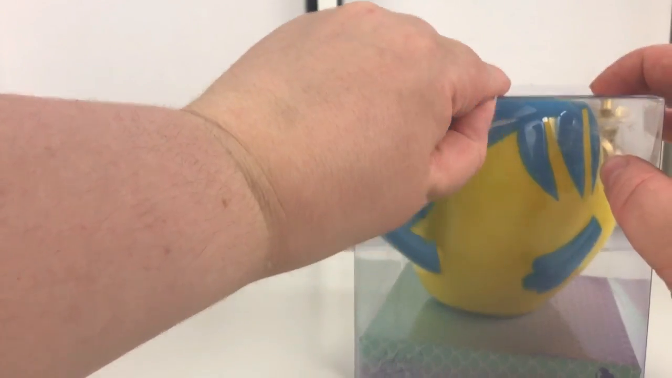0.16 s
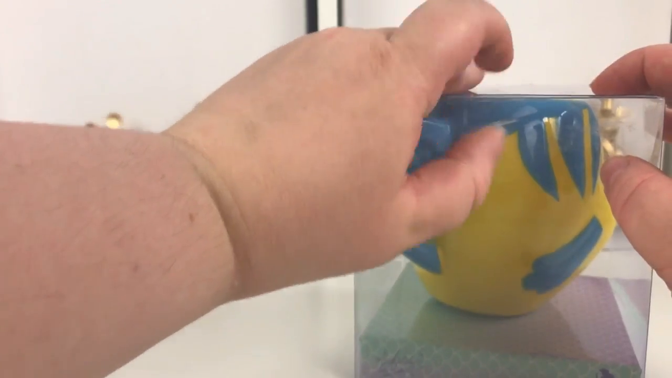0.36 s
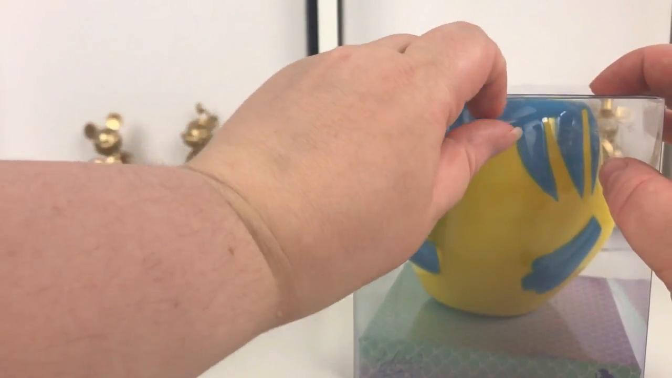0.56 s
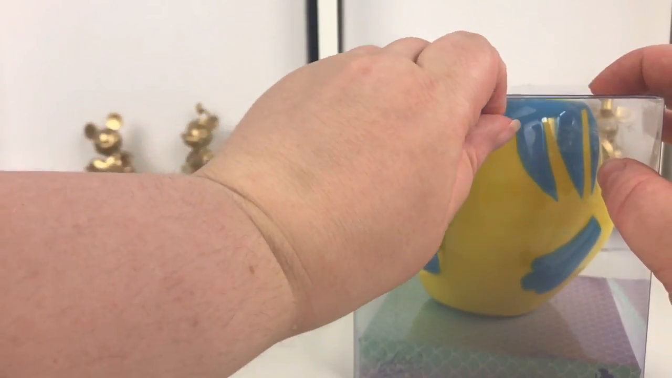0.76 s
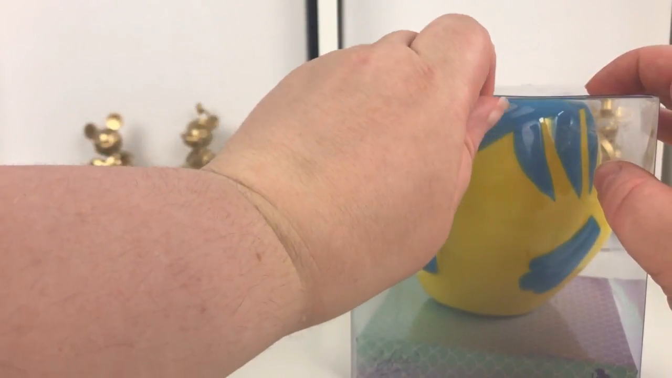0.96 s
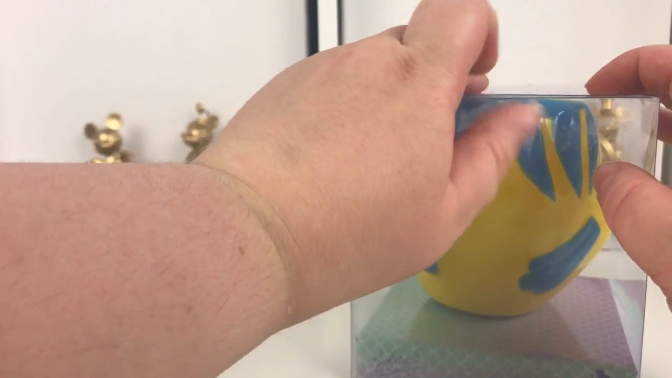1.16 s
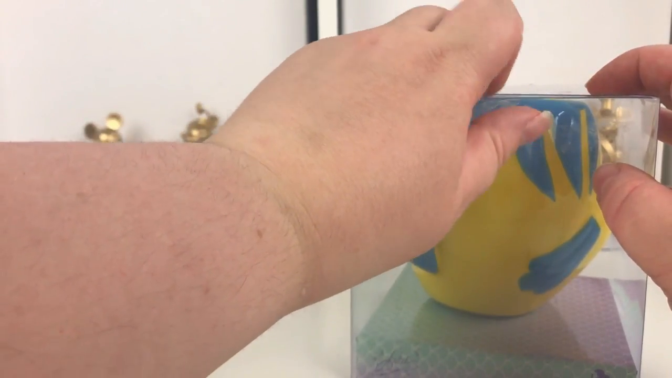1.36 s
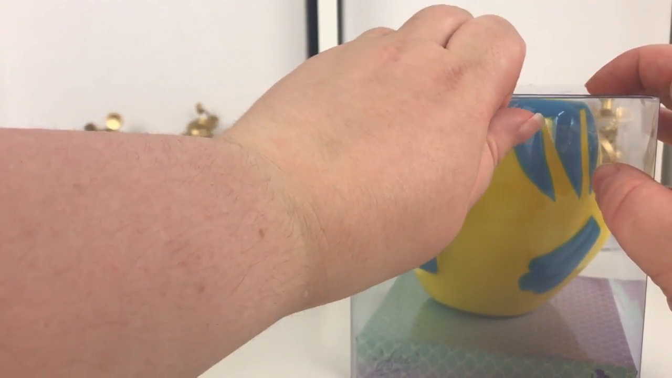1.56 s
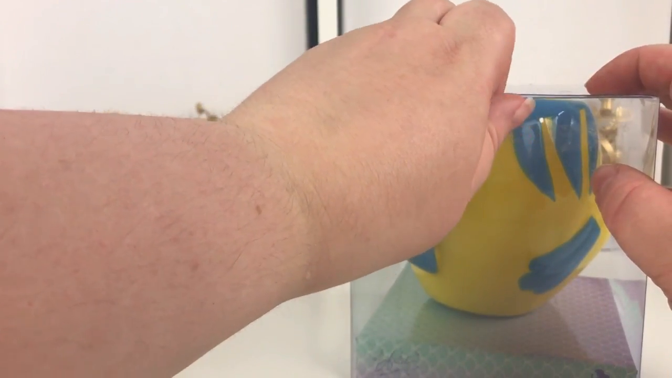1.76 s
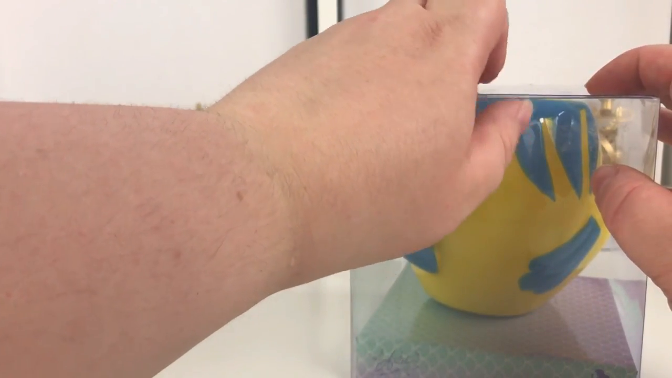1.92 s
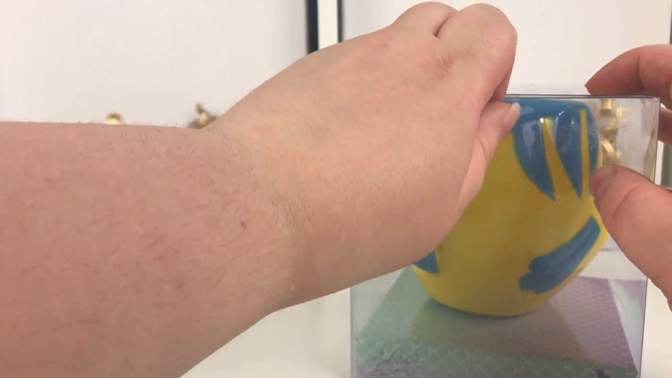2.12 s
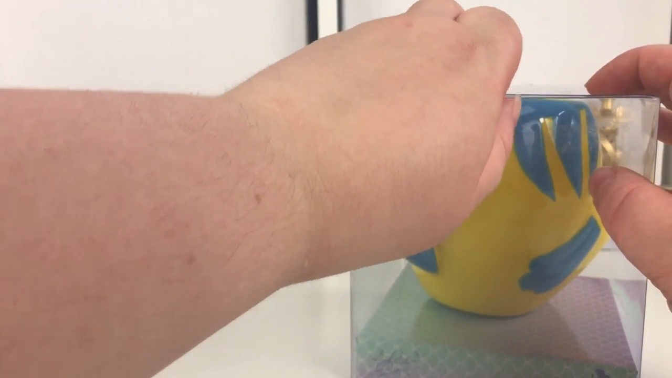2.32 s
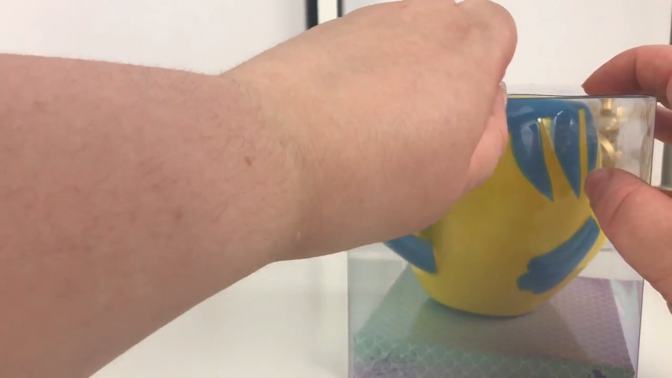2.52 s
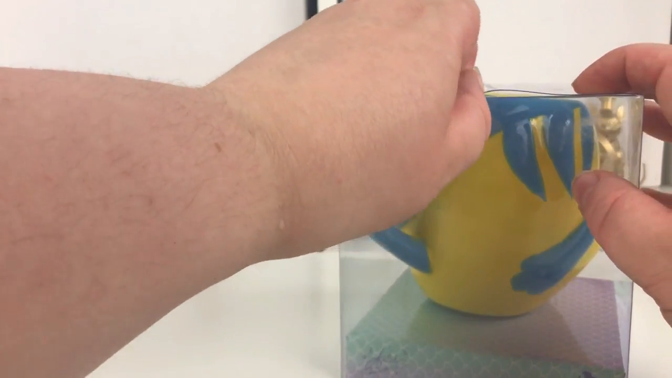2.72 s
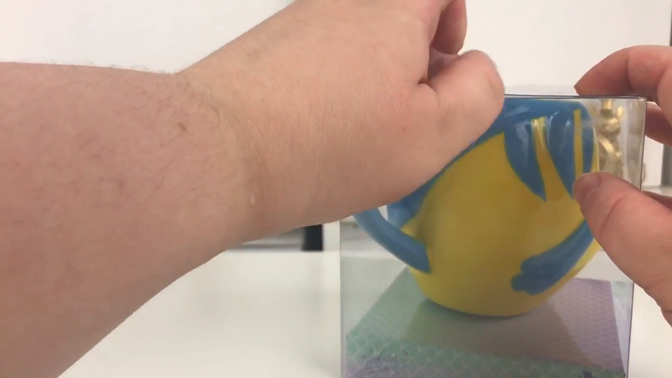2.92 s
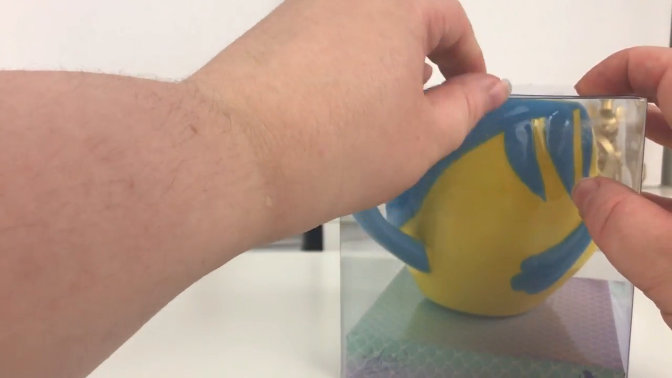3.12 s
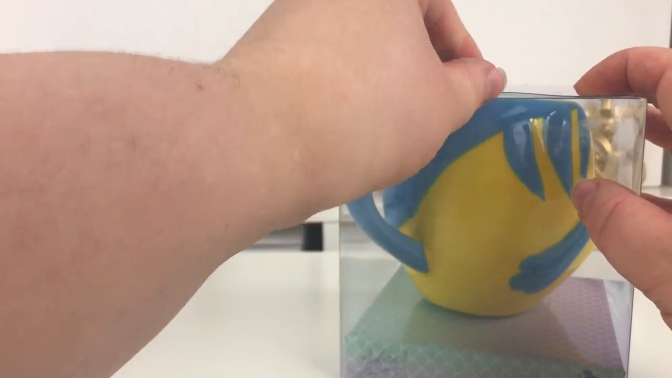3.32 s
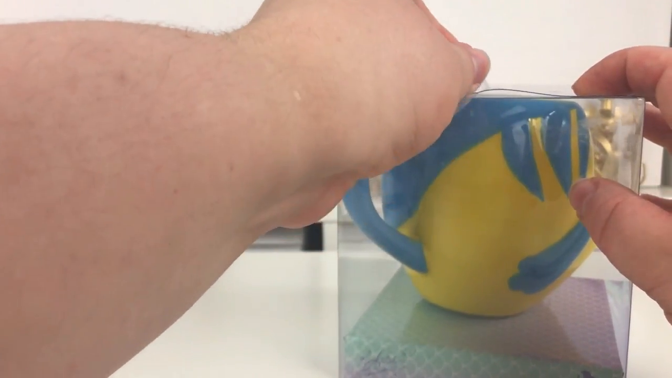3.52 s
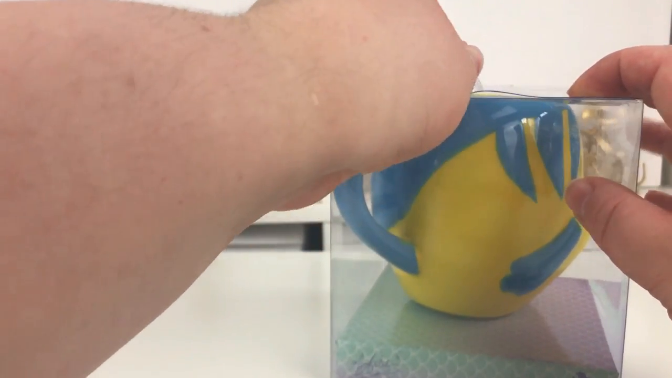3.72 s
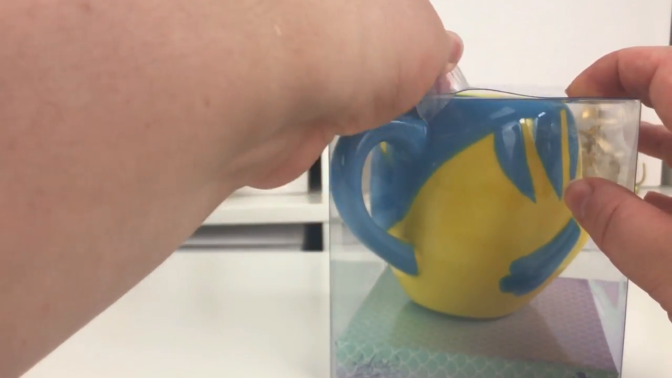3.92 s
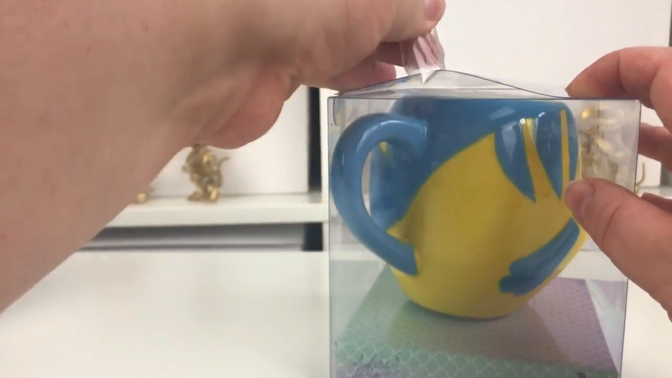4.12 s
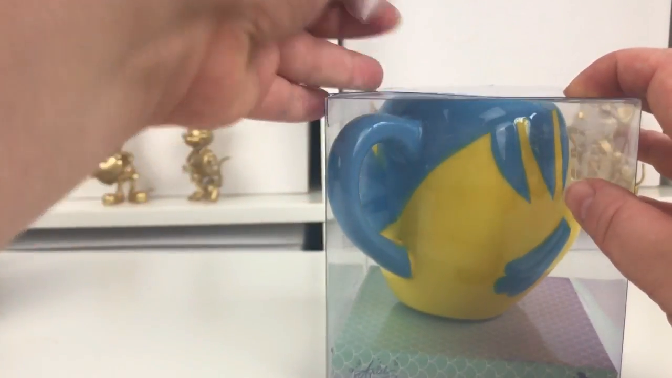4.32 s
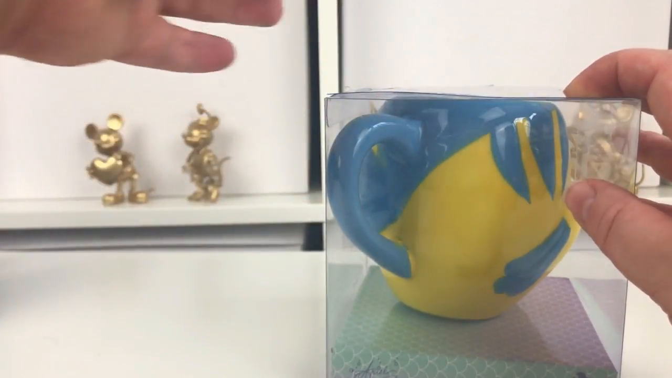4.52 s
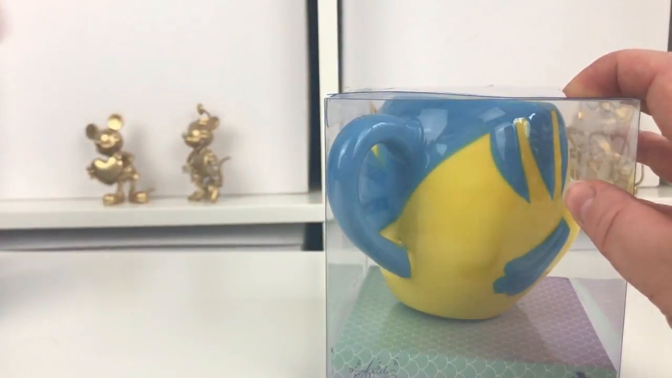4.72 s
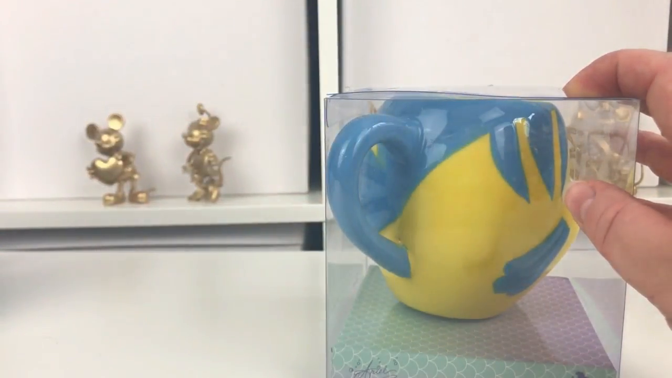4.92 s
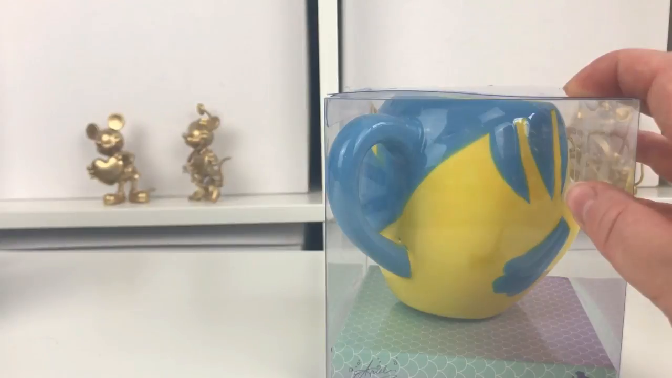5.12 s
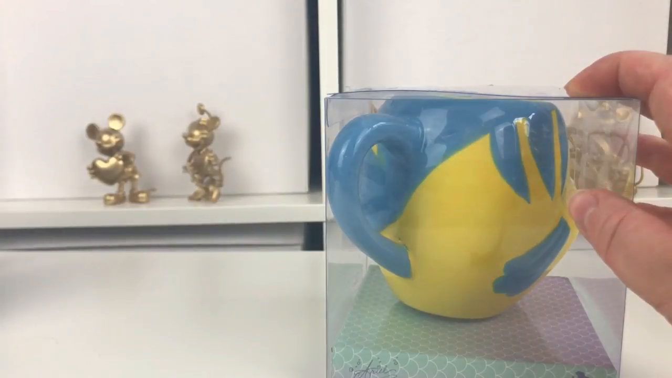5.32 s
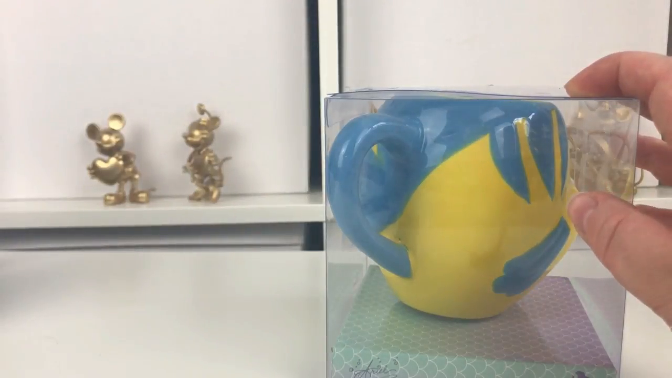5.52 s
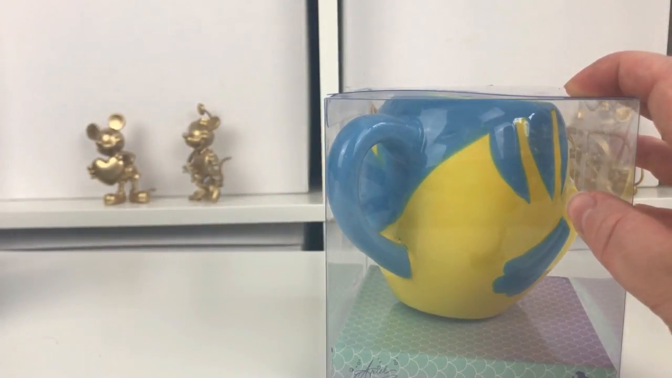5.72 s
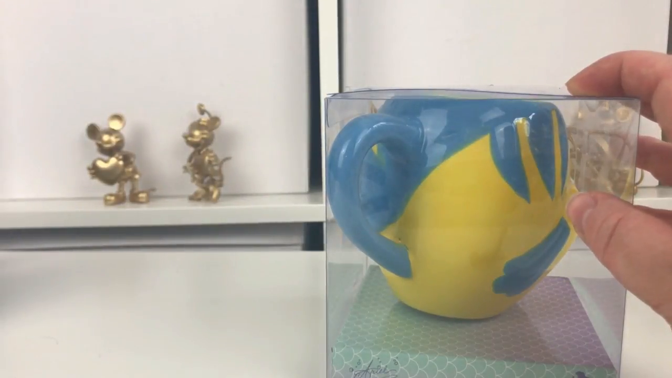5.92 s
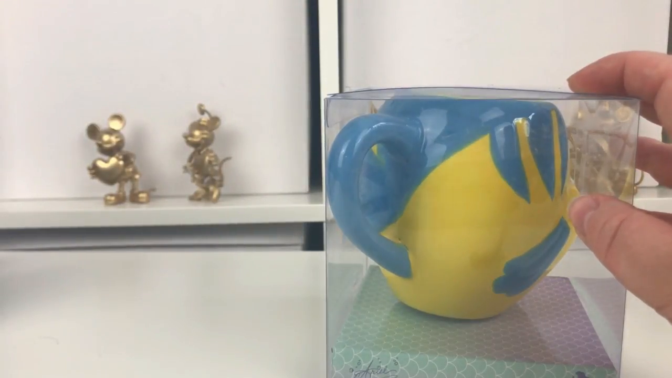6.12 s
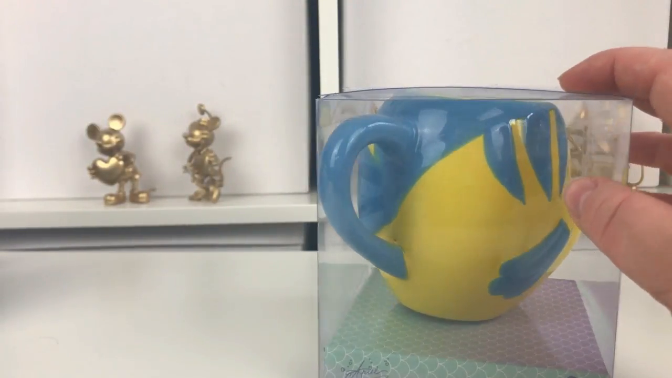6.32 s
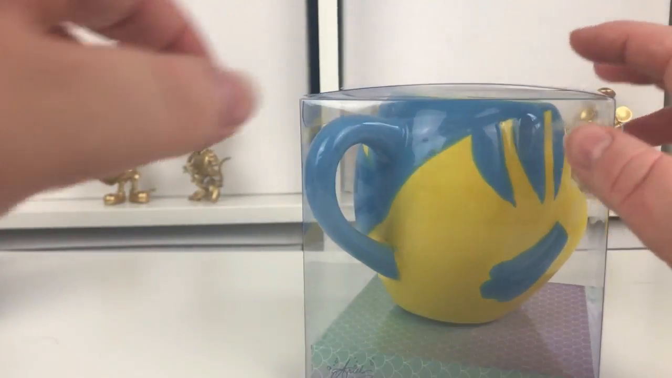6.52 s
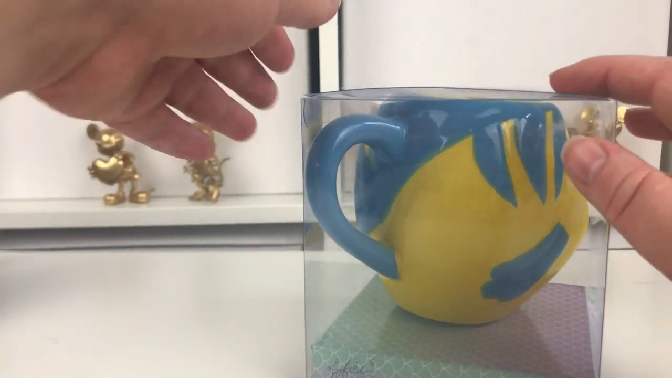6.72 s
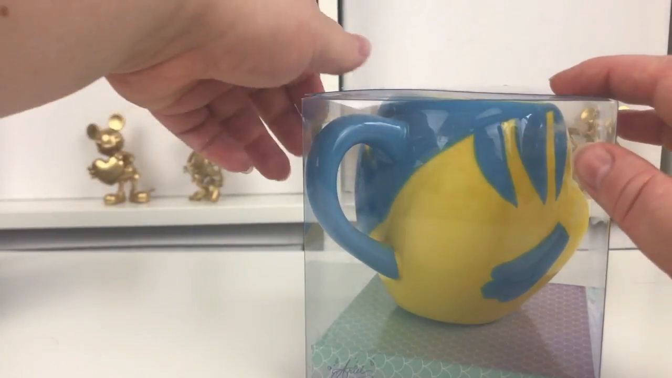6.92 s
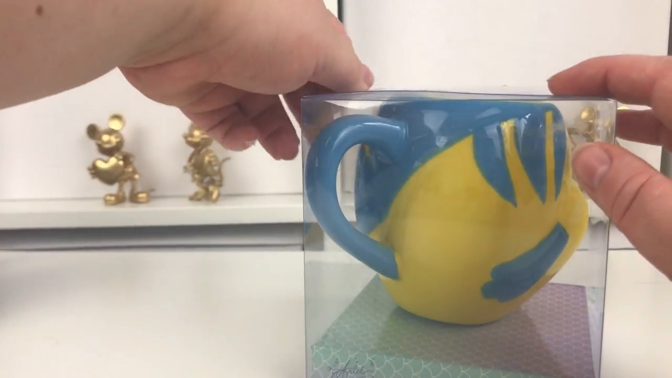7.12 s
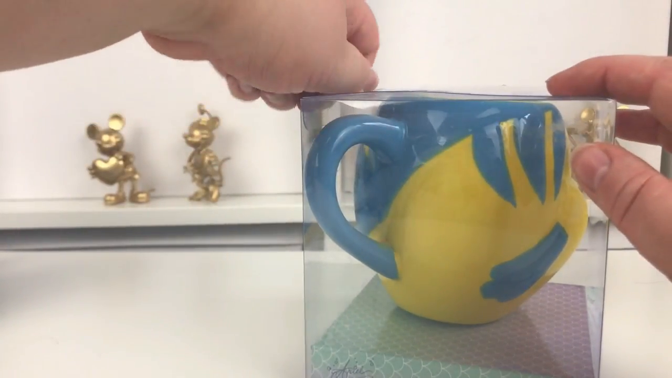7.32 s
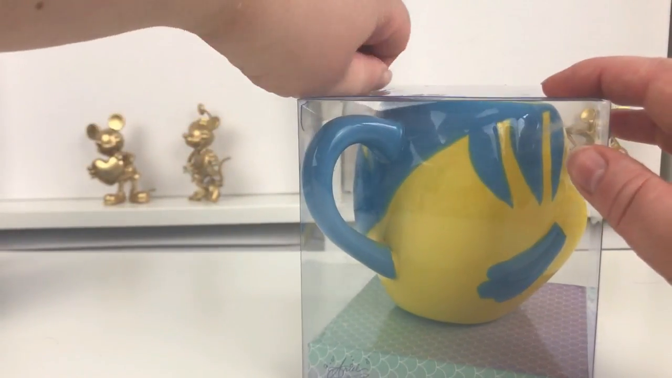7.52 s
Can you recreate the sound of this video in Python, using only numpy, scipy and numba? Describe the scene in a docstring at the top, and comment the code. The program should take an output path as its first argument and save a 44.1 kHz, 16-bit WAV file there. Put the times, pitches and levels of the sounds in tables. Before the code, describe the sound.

A small quiet room, microphone very close to a thin hollow plastic box. Soft skin rubbing and light knocks lead to a loud, sharp lid snap at 0.3 s, ringing briefly with short room echoes and a little hiss. From 0.5 to 1.7 s come irregular nail ticks, dull wall knocks and faint airy peeling. At 1.8-1.95 s a nail judders in a rapid rattle, followed by rubbing and scattered clicks until about 3.9 s, with stronger ticks near 3.0 and 3.6 s. Adhesive sizzle swells from 4.05 s into a hard springy pop at 4.2 s, then another at 4.47 s. Rubbing fades by 5 s into low room hush. Faint crinkles come at 5.7-6.1 s, a soft hand slide at 6.5 s, gentle taps and rubbing until 7.4 s, then one bright snap at 7.58 s.

```python
"""A small quiet room: fingernails pick at stickers on a thin clear plastic box, close to the microphone.
Nails tick and judder on the lid, fingers knock the walls, and four times the sheet snaps back: each contact
is a noise crack, a modal ring of the box and room echoes. Adhesive sizzles as it peels: random grains
through a gliding film resonance. The freed sticker crinkles, then the hand slides and picks again;
skin rubs, wall rumble and room hush are shaped noise, and loud peaks raise the recorder's hiss."""
import sys
import numpy as np
from scipy import signal
from scipy.fft import rfft, irfft, next_fast_len
from scipy.io import wavfile
from scipy.ndimage import uniform_filter1d, map_coordinates
from numba import njit

SR = 44100
rng = np.random.default_rng(int(sys.argv[2]) if len(sys.argv) > 2 else 0)


def unload_wav(signal):
    """Save mono or channel-first audio to the path in sys.argv[1] as 16-bit WAV at rate SR, clipped to [-1, 1]."""
    wavfile.write(
        sys.argv[1],
        SR,
        np.round(np.clip(np.atleast_2d(signal).T, -1, 1) * 32767).astype(np.int16),
    )


N = 337806
TIME = np.arange(N) / SR
RING_TIME = np.arange(SR // 2) / SR

# band edges of a snapping sheet's spectrum: (edge [Hz])
SNAP_EDGES_HZ = (30, 110, 180, 380, 520, 700, 850, 1400, 2800, 4500, 5600, 8500, 18000)


def undb(db):
    """Decibels to gain."""
    return 10 ** (np.asarray(db) / 20)


def unit(x):
    """Scale to unit energy."""
    return x / np.sqrt(np.sum(x ** 2) + 1e-18)


def fade(t60_s):
    """A decay that loses 60 dB in t60_s."""
    return np.exp(-np.log(1000) * RING_TIME / max(t60_s, 1e-4))


def band(x, low_hz, high_hz):
    """Causal band-pass."""
    return signal.sosfilt(signal.butter(3, (low_hz, high_hz), "band", fs=SR, output="sos"), x)


def colour(x, points):
    """Weight the spectrum of x by (frequency [Hz], level [dB]) points, then scale to standard deviation 1."""
    hz, db = np.transpose(points)
    size = next_fast_len(N)
    bin_hz = np.maximum(np.fft.rfftfreq(size, 1 / SR), 1)
    gain = undb(np.interp(np.log(bin_hz), np.log(hz), db, left=-80, right=-80))
    y = irfft(rfft(x, size) * gain, size)[:N]
    return y / np.std(y)


def walk(rate_hz):
    """Slow chance with a spread near 1: random knots joined by lines."""
    knots = rng.standard_normal(4096)
    return np.interp(TIME * rate_hz, np.arange(len(knots)), knots)


def grains(rate_hz, spread_db):
    """Tiny releases at random moments, a few far stronger than the rest."""
    happens = rng.random(N) < rate_hz / SR
    strength = undb(spread_db * np.minimum(rng.exponential(size=N), 4))
    return happens * rng.standard_normal(N) * strength


def stroke(start_s, end_s, attack_s, release_s):
    """A movement of the hand: it builds, holds, and dies away after its end."""
    rise = np.clip((TIME - start_s) / attack_s, 0, 1)
    return rise * np.exp(-np.maximum(TIME - end_s, 0) / release_s)


@njit
def resonate(x, hz, sharpness):
    """A resonance whose centre moves; gain 1 at the centre."""
    y, b, low = np.empty(len(x)), 0., 0.
    k = 1 / sharpness
    for i in range(len(x)):
        g = np.tan(np.pi * hz[i] / SR)
        v = (b + g * (x[i] - low)) / (1 + g * (g + k))
        b, low, y[i] = 2 * v - b, low + 2 * g * v, k * v
    return y


def box_ring(damping, detune):
    """The box's modes; a touch shifts them a little, and its place favours some over others."""
    # modes before detune and damping: (frequency [Hz], level [dB], t60 [s])
    box_modes = [(86, -10, 0.4), (125, -2, 0.19), (166.7, -1.5, 0.25), (213.2, -2, 0.12),
                 (289.4, -2.5, 0.28), (342.2, 1.5, 0.19), (372.3, -7, 0.26), (423.3, -2, 0.14),
                 (448, -4.5, 0.13), (552.6, -1, 0.15), (753, -7.5, 0.055), (810, -10.5, 0.017),
                 (982, 0.5, 0.045), (1119.4, -0.5, .07), (1242, -6, 0.057), (1579, -9.5, 0.085),
                 (1797, -10, 0.1), (1867, -15, .06), (2390, -6, 0.054), (3040, -9.5, .07),
                 (3286, -0.5, 0.041), (3950, 1.5, 0.055), (4040, -5, 0.029), (6100, -7.5, .06),
                 (6400, 1.5, 0.053), (8300, -13, 0.014)]
    hz, db, t60_s = np.transpose(box_modes)[:, :, None]
    shift, place = rng.standard_normal((2, *hz.shape))
    hz = hz * np.exp(detune * shift)
    db = db + min(90 * detune, 6) * place
    t = RING_TIME[:len(RING_TIME) // 2]
    decay = np.exp(-np.log(1000) * damping * t / t60_s)
    ring = np.sum(undb(db) * np.sin(2 * np.pi * hz * t) * decay, axis=0)
    return np.pad(ring, (0, len(RING_TIME) - len(ring)))


def band_levels(edges_hz, bands_db, tilt_db):
    """Share a contact's energy among the bands; a harder touch tilts it towards the treble."""
    octaves = np.log2(np.multiply(edges_hz[:-1], edges_hz[1:])) / 2
    return unit(undb(np.array(bands_db) + tilt_db * octaves))


def contacts(rows, edges_hz, bands_db, crack_t60_s, crack_slope, ring_db, ring_slope,
             damping, detune, room_db, gain_db):
    """Each contact is a short crack in the sheet, the ring of the box, and the room's answer."""
    # crack_t60_s, ring_db and room_db hold at 1 kHz; gain_db adds to every row's level
    out = np.zeros(N + len(RING_TIME))
    reference = np.sqrt(SR / 100)  # levels are energy spread over a hundredth of a second
    room_onset = 1 - np.exp(-RING_TIME / 0.01)
    for time_s, db, tilt_db in rows:
        crack, echoes = rng.standard_normal((2, len(RING_TIME)))
        crack[0] = 6  # the release itself is one sharp step, ahead of the scattered waves
        ring = box_ring(damping, detune)
        start = max(int(time_s * SR), 0)
        shares = band_levels(edges_hz, bands_db, tilt_db)
        for low_hz, high_hz, share in zip(edges_hz, edges_hz[1:], shares):
            khz = np.sqrt(low_hz * high_hz) / 1000
            # bending waves and room echoes both die sooner in the treble
            fading_crack = crack * fade(crack_t60_s / khz ** crack_slope)
            fading_echoes = echoes * room_onset * fade(0.18 / khz ** 0.13)
            parts = np.array([fading_crack, ring, fading_echoes])
            direct, body, room = map(unit, band(parts, low_hz, high_hz))
            close = unit(direct + undb(ring_db) / khz ** ring_slope * body)
            sound = unit(close + undb(room_db) / khz ** 0.33 * room)
            out[start:start + len(sound)] += reference * undb(db + gain_db) * share * sound
    return out[:N]


def flicks():
    """A nail slips off the rim and the lid snaps back."""
    # (time [s], level before gain_db [dB], tilt [dB/octave])
    events = [(0.3241, -4.5, -1.03), (7.5833, -9.5, 0.83)]
    # spectrum before tilt: (level per band [dB])
    bands_db = [-30.5, -21, -12.5, -15.5, -18.5, -12, -14, -22, -28.5, -37, -28.5, -30]
    return contacts(events, SNAP_EDGES_HZ, bands_db, crack_t60_s=0.063, crack_slope=0.14, ring_db=4.0,
                    ring_slope=.6, damping=1.5, detune=.004, room_db=-12.5, gain_db=1.5)


def releases():
    """The sticker tears free and the lifted wall springs back."""
    # (time [s], level before gain_db [dB], tilt [dB/octave])
    events = [(4.2058, -3.4, 0.1), (4.4749, -7, -0.87)]
    # spectrum before tilt: (level per band [dB])
    bands_db = [-25, -16.5, -12.5, -7.5, -24, -31, -16, -18.5, -17.5, -26, -18.5, -21]
    return contacts(events, SNAP_EDGES_HZ, bands_db, crack_t60_s=0.06, crack_slope=0.19, ring_db=4.5,
                    ring_slope=.6, damping=1.3, detune=.004, room_db=-11.0, gain_db=1.5)


def ticks():
    """A nail catches, or a spot of glue lets go: mostly crack, hardly ringing the box."""
    # (time [s], level before gain_db [dB], tilt [dB/octave])
    events = [(0.1338, -38, 11), (0.2812, -27.5, 0), (0.3281, -25, 0), (0.482, -44, 8), (0.8547, -34.5, 18),
              (0.9715, -37, 16), (1.002, -35.5, 7.5), (1.0299, -32.5, 1.5), (1.0441, -25, 22),
              (1.2837, -31.5, 4), (1.3049, -39, 2), (1.3334, -26.5, 2), (1.3371, -23, -1.5),
              (1.341, -31, -4.5), (1.4726, -48, -1), (1.5667, -42.5, 4), (1.6098, -29, 16),
              (1.6399, -33.5, 1), (1.7103, -42.5, 5), (2.0043, -23.5, -0.5), (2.0978, -36, 6),
              (2.1123, -26, 3), (2.1339, -37.5, -4.5), (2.2899, -42.5, -4.5), (2.3632, -41.5, 12),
              (2.3849, -42, 5), (2.5278, -34, -3), (2.7044, -34, 5), (2.7602, -35, 23),
              (2.8735, -33.5, 2.5), (3.0229, -31.5, 3), (3.0276, -31, 0), (3.041, -21.5, -0.9),
              (3.2623, -39.5, -8), (3.3508, -27.5, 15), (3.3684, -32.5, 1.5), (3.5278, -25.5, 8),
              (3.6199, -22.5, 7), (3.8542, -37.5, 2.5), (4.2485, -23.5, -2), (4.2618, -35, -3),
              (4.4776, -17, 3), (4.6633, -45, 0), (4.707, -40.5, 3), (4.719, -45, 2)]
    # (band edge [Hz])
    edges_hz = (1400, 2900, 4500, 5600, 8000, 12000, 18000)
    # spectrum before tilt: (level per band [dB])
    bands_db = [-9.5, .5, -7, -1.2, -1, .6]
    return contacts(events, edges_hz, bands_db, crack_t60_s=0.013, crack_slope=0.16, ring_db=-6,
                    ring_slope=0.12, damping=2.0, detune=0.084, room_db=-9.5, gain_db=0.3)


def slips():
    """A nail judders over the lid."""
    # (time [s], level before gain_db [dB], tilt [dB/octave])
    events = [(1.7959, -23, 1), (1.8008, -27.5, 3), (1.8085, -22, 0.5), (1.8175, -20.5, -3.5),
              (1.8288, -22, .2), (1.8428, -19.5, .2), (1.8556, -19, 0), (1.8992, -22.5, 1),
              (1.9176, -22, 0), (1.9266, -20, 0), (1.9361, -22.5, 0), (1.9636, -23.5, -1)]
    # (band edge [Hz])
    edges_hz = (140, 310, 700, 1400, 4500, 5600, 18000)
    # spectrum before tilt: (level per band [dB])
    bands_db = [-16.5, -4.5, -0.5, -10, -44, -20]
    return contacts(events, edges_hz, bands_db, crack_t60_s=0.021, crack_slope=0.29, ring_db=4.5,
                    ring_slope=1.7, damping=1.23, detune=0.0245, room_db=-15, gain_db=-2.0)


def scraping():
    """Fine stick-slip of a nail edge, growing as the finger presses harder, until it lets go."""
    # (start [s], end [s], final lid level [dB], nail treble over lid [dB])
    scrapes = [(0.3, 0.332, -37.5, -11.5), (0.318, 0.326, -5, -24), (1.308, 1.346, -39, 4),
               (1.781, 1.804, -33, -2), (1.787, 1.823, -30.5, -14), (1.981, 2.007, -31, -4),
               (2.996, 3.047, -37.5, 5.5), (3.512, 3.533, -35, 2), (4.151, 4.201, -37.5, -7),
               (4.45, 4.478, -30.5, 2), (7.568, 7.602, -26, -10)]
    catches = grains(rate_hz=7600, spread_db=2.5)
    lid = colour(catches, [(400, -8), (950, 6.0), (1600, -3.5), (3000, -16.5), (5000, -29)])
    nail = colour(catches, [(1500, -21.5), (3600, 2), (4900, -5), (6600, -1), (13000, -2), (17000, -10)])
    out = np.zeros(N)
    for start_s, end_s, db, treble_db in scrapes:
        press = np.interp(TIME, [start_s, max(end_s, start_s + .001), end_s + .004], [0, 1, 0])
        out += press * undb(db) * (lid + undb(treble_db) * nail)
    return out


def peeling():
    """Threads of glue break by the thousand, in uneven spurts, and shake the lengthening film."""
    # the strip rings lower as it lengthens: (time [s], frequency before wobble [Hz], resonance level [dB])
    film_path = [(0.9, 7790, -7.5), (1.2, 7160, -6.5), (2.6, 9296, -10), (2.9, 8800, -10), (3.6, 8400, -8),
                 (3.78, 7950, -7.5), (3.95, 7080, 2), (4.05, 6700, 8), (4.18, 6270, 5), (4.4, 5860, 4),
                 (4.47, 5500, -3.5)]
    # taut film and lid: (frequency [Hz], level per Hz [dB])
    sizzle_colour = [(1500, -15), (2400, -8.5), (3300, -3), (4100, 0), (4900, -6), (6400, 1.5),
                     (8500, -11.5), (10500, -20.5)]
    # airy treble: (frequency [Hz], level per Hz [dB])
    air_colour = [(6500, -21), (8500, -6), (10000, -1), (12000, 1.5), (13700, 2), (15600, 2), (17000, -3.5)]
    # swelling with tension: (start [s], end [s], final sizzle [dB], swell [dB], air over sizzle [dB])
    pulls = [(0.948, 1.042, -49.5, 9, 6.5), (1.082, 1.188, -56.5, -2, 6), (2.57, 2.674, -52, 15, 9),
             (2.692, 2.92, -50.5, 11, 9.5), (3.0, 3.06, -55, 5, 2), (3.574, 3.667, -48, 10, 15.5),
             (3.676, 3.788, -51.5, -1.5, 10), (3.892, 4.03, -44, 9.5, 4), (4.048, 4.209, -28.5, 21.5, -1.5),
             (4.347, 4.467, -36, 20, -4), (7.25, 7.369, -63, 13, 9), (7.463, 7.62, -58, 8, 10)]
    breaks = grains(rate_hz=6000, spread_db=2.6) * undb(2.4 * walk(120))
    time_s, hz, db = np.transpose(film_path)
    wobble = np.exp(0.04 * walk(45))  # the uneven glue line shifts the strip's pitch
    film_hz = np.interp(TIME, time_s, hz) * wobble
    first_mode = resonate(breaks, film_hz, 6.5)
    second_mode = resonate(breaks, 1.97 * film_hz, 6.2)
    breaks = breaks + undb(np.interp(TIME, time_s, db)) * (first_mode + .6 * second_mode)
    # waves return from the far end of the strip three cycles later and comb the hiss
    returned = map_coordinates(breaks, [np.arange(N) - 3 * SR / film_hz], order=3)
    breaks = breaks + .28 * returned
    # the lid's dense treble modes, set ringing by the peel
    sheet = unit(rng.standard_normal(len(RING_TIME)) * fade(.035))
    breaks = breaks + undb(-2) * signal.fftconvolve(breaks, sheet)[:N]
    sizzle, air = colour(breaks, sizzle_colour), colour(breaks, air_colour)
    out = np.zeros(N)
    for start_s, end_s, final_db, swell_db, air_db in pulls:
        tension = undb(np.interp(TIME, [start_s, end_s], [final_db - swell_db, final_db]))
        pull = tension * stroke(start_s, end_s, attack_s=0.032, release_s=0.03)
        out += pull * (sizzle + undb(air_db) * air)
    return out


def knocks():
    """Fingers knock and flex the walls, ringing the box strongly."""
    # (time [s], level before gain_db [dB], tilt [dB/octave])
    events = [(0.0951, -26, 1), (0.1935, -30, 0), (0.2038, -29, -2.5), (0.466, -37, 2),
              (0.6756, -33.5, -.5), (0.8754, -31.5, -0.7), (1.029, -32.5, 5.5), (1.048, -30.5, 3.5),
              (1.0654, -31.5, -2.5), (1.3176, -27, 0), (1.3399, -25, 1.2), (1.352, -29.5, -0.5),
              (1.4733, -26.5, 1), (2.0043, -31, -1.5), (2.2221, -32.5, 1), (2.5215, -38, 1),
              (2.9888, -30, -1), (3.02, -32, -3), (3.0423, -22, 1), (3.2639, -27, 3), (3.2785, -33, -4),
              (3.5183, -29.5, 4.5), (3.7971, -29.5, -0.6), (3.8557, -31.5, -0.8), (3.916, -21, -4.5),
              (4.048, -30.5, -4), (4.0598, -27, -5.5), (6.3262, -45.5, -2), (6.4333, -38.5, -1.5),
              (6.6634, -29, 0.5), (6.686, -34, -0.5), (6.738, -43, 4), (6.815, -45.5, 5.5),
              (6.838, -43, 2.5), (6.8553, -33, -2), (6.9163, -37, -8), (7.0293, -38, 0), (7.2155, -39, 2),
              (7.2359, -34, -1.5)]
    # (band edge [Hz])
    edges_hz = (60, 130, 260, 480, 700, 1600, 4000)
    # spectrum before tilt: (level per band [dB])
    bands_db = [-6, -4, -1.5, -10.5, -8.5, -17.5]
    return contacts(events, edges_hz, bands_db, crack_t60_s=0.12, crack_slope=.5, ring_db=10.0,
                    ring_slope=.4, damping=2.1, detune=0.15, room_db=-16.5, gain_db=-2.5)


def crinkles():
    """The loose sticker crinkles further off: little box ring, much room."""
    # (time [s], level before gain_db [dB], tilt [dB/octave])
    events = [(5.7117, -38.5, -4.5), (5.739, -38.5, 5.5), (5.7725, -41, 2), (5.8163, -43, 7),
              (5.8434, -45.5, 2.5), (5.9122, -40, -4), (5.9181, -36.5, 2.5), (5.9248, -33.5, 4.5),
              (6.0529, -47.5, 7.5), (6.0688, -42.5, 3.5), (6.8544, -46.5, .3), (7.317, -39.5, 3.5),
              (7.3463, -32, 12)]
    # (band edge [Hz])
    edges_hz = (250, 700, 2500, 7000, 16000)
    # spectrum before tilt: (level per band [dB])
    bands_db = [-10.5, 0.5, 1, -1]
    return contacts(events, edges_hz, bands_db, crack_t60_s=0.048, crack_slope=0.11, ring_db=-8,
                    ring_slope=.6, damping=2.7, detune=0.056, room_db=-3.5, gain_db=1.0)


def rustling():
    """Tiny creases give way as the fingers fold the loose sticker."""
    # (frequency [Hz], level per Hz [dB])
    rustle_colour = [(300, -8), (1000, -8), (3200, 1), (5000, -3), (8500, 3), (13000, 0), (16500, -6)]
    creases = colour(grains(rate_hz=3000, spread_db=3.5), rustle_colour)
    return undb(-53) * creases * stroke(5.71, 5.84, attack_s=.012, release_s=0.067)


def rubbing():
    """Skin drags unevenly on the plastic, now and then catching, and the walls rumble under the grip."""
    # (start [s], end [s], rub gain [dB], wall rumble level [dB])
    rubs = [(-0.03, 0.264, -55.5, -46.5), (0.327, 0.434, -60, -50.5), (0.547, 0.66, -65, -60),
            (1.048, 1.2, -65, -58), (1.48, 1.64, -58, -55), (1.89, 2.33, -53, -51),
            (2.611, 2.908, -56, -53), (3.272, 3.426, -54.5, -51), (3.54, 3.758, -52.5, -48.5),
            (3.778, 3.88, -48, -43.5), (4.002, 4.43, -51.5, -46), (4.516, 4.813, -57.5, -52.5),
            (6.647, 6.917, -58, -58.5), (6.984, 7.165, -66.5, -59.5), (7.208, 7.333, -61, -53.5),
            (7.51, 7.66, -54.5, -50)]
    # skin on plastic: (frequency [Hz], level per Hz [dB])
    rub_colour = [(400, -14), (720, -3.5), (1150, -3.5), (1600, -2.5), (2300, -9), (3500, -11.5),
                  (6000, -17), (12000, -30)]
    # walls under the grip: (frequency [Hz], level per Hz [dB])
    rumble_colour = [(30, -14.5), (85, 1.5), (170, -3.5), (230, -8), (300, 2.5), (440, -7), (600, -4.5),
                     (1000, -23.5)]
    skin, wall = rng.standard_normal((2, N)) * undb(0.77 * walk(60))
    ring = box_ring(damping=2.5, detune=0.0081)
    catches = signal.fftconvolve(grains(rate_hz=96, spread_db=3.5), ring)[:N]
    rub = undb(-3.5) * colour(skin, rub_colour) + undb(-1.5) * colour(catches, rub_colour)
    rumble = colour(wall, rumble_colour)
    out = np.zeros(N)
    for start_s, end_s, rub_db, rumble_db in rubs:
        touch = stroke(start_s, end_s, attack_s=.035, release_s=0.11)
        out += touch * (undb(rub_db) * rub + undb(rumble_db) * rumble)
    return out


def sliding():
    """The holding hand slides to a new grip in one stroke of uneven skin noise."""
    # (frequency [Hz], level per Hz [dB])
    slide_colour = [(350, -16), (600, -4.5), (1070, -4.5), (1780, -9.5), (1900, -10), (2950, -10),
                    (8050, -19), (12300, -19.5), (16000, -23)]
    drag = rng.standard_normal(N) * undb(0.77 * walk(60))
    return undb(-43.5) * colour(drag, slide_colour) * stroke(6.452, 6.565, attack_s=.05, release_s=.055)


def room_tone():
    """A low, steady indoor hush."""
    # (frequency [Hz], level per Hz [dB])
    room_colour = [(20, -8), (45, 0), (110, -1), (200, 1), (300, 0), (400, -8), (630, -12), (1000, -12.5),
                   (2000, -16.5), (3200, -18.5), (5000, -24), (8000, -28), (13000, -31), (17000, -35)]
    return undb(-55) * colour(rng.standard_normal(N), room_colour)


def range_hiss(x):
    """The recorder's hiss: up at the outset, and held up for a while after every loud peak."""
    # (frequency [Hz], level per Hz [dB])
    hiss_colour = [(100, 1), (700, 1.5), (1500, -1), (5500, -3), (12000, -4.5), (16500, -5)]
    switch_db, hold_s, hiss_db = -16, .38, -57.5
    loud = np.abs(x) > undb(switch_db)
    last_peak_s = np.maximum.accumulate(TIME * loud)
    held = uniform_filter1d(1. * (TIME - last_peak_s < hold_s), size=400)
    return undb(hiss_db) * held * colour(rng.standard_normal(N), hiss_colour)


def scene():
    """All the handling over the room's hush."""
    nails = flicks() + ticks() + slips() + scraping()
    sticker = releases() + peeling() + crinkles() + rustling()
    hands = knocks() + rubbing() + sliding()
    return (nails + sticker + hands + room_tone())[None]


def record(dry):
    """The hardest snaps overload the microphone, the top is cut, and loud peaks raise the hiss."""
    clipped = dry / (1 + dry ** 8) ** (1 / 8)
    top_cut = signal.ellip(8, .2, 70, 15900, fs=SR, output="sos")  # low-pass, edge in Hz
    hiss = range_hiss(signal.sosfilt(top_cut, clipped[0]))
    return signal.sosfilt(top_cut, clipped + hiss)


dry = scene()
out = record(dry)
unload_wav(out)
```